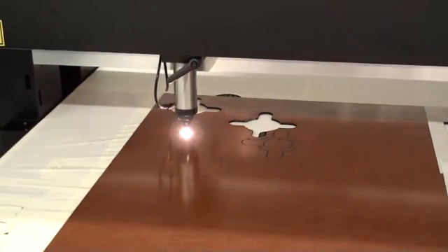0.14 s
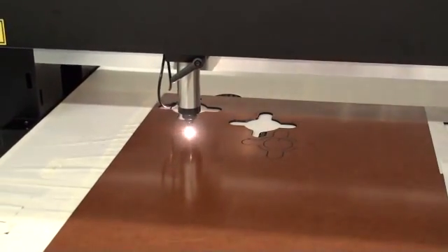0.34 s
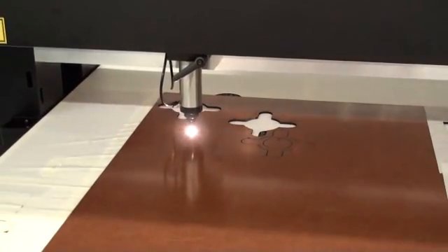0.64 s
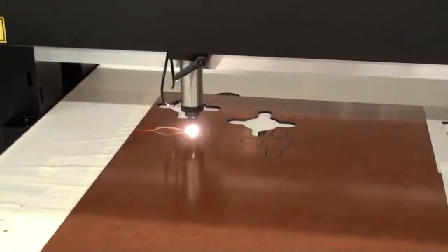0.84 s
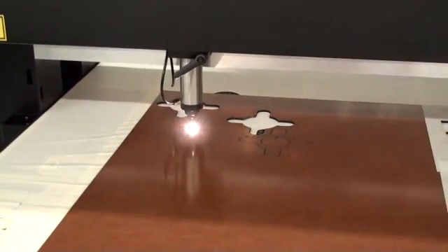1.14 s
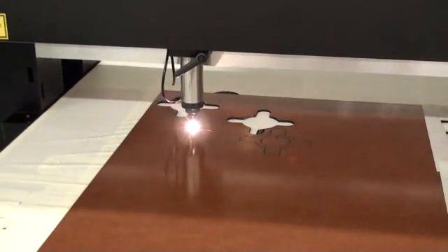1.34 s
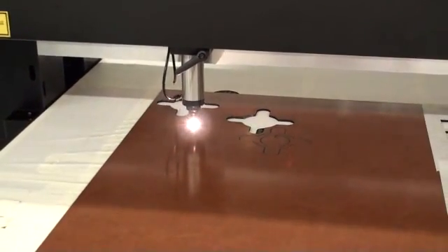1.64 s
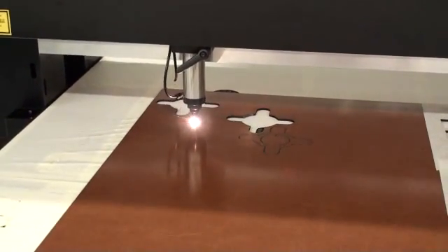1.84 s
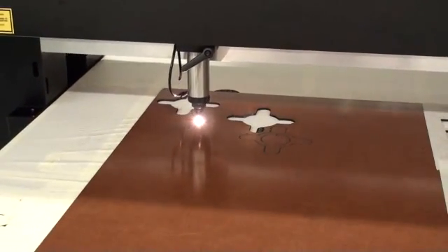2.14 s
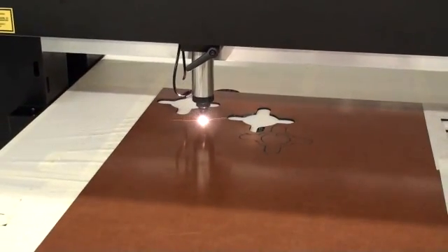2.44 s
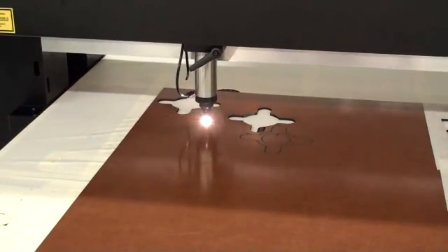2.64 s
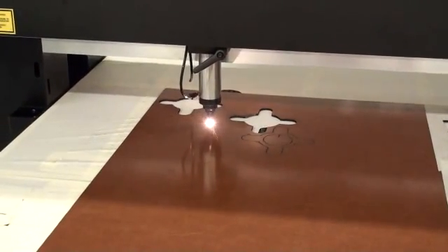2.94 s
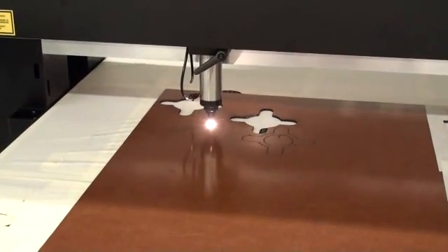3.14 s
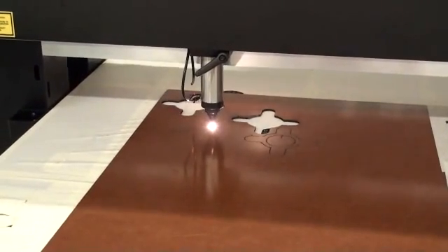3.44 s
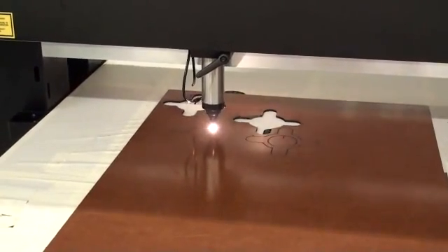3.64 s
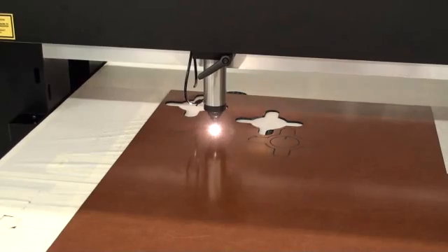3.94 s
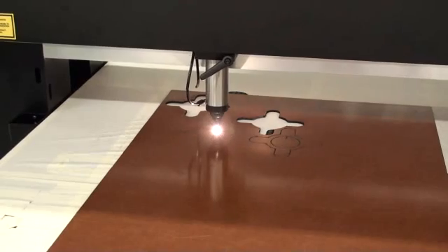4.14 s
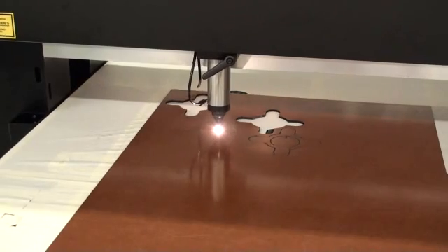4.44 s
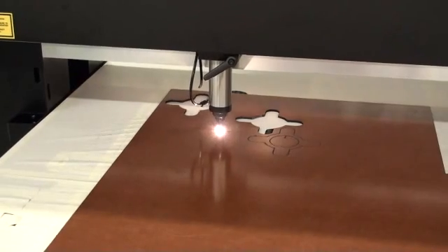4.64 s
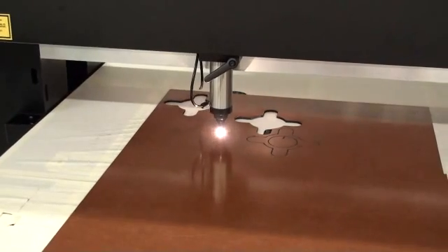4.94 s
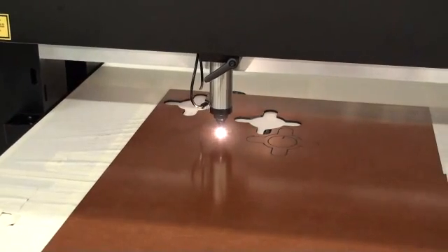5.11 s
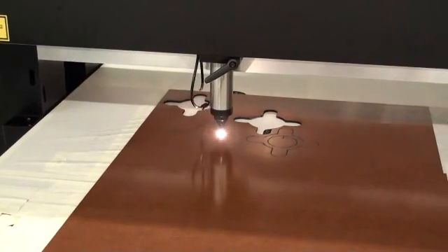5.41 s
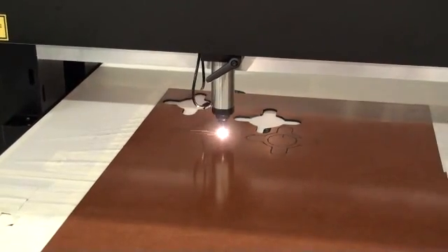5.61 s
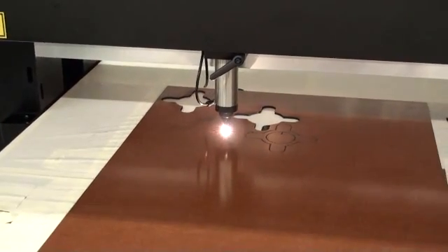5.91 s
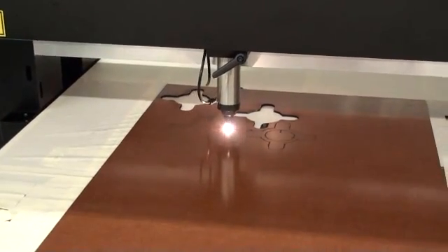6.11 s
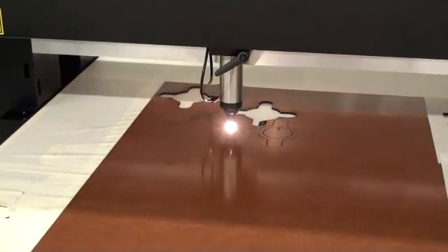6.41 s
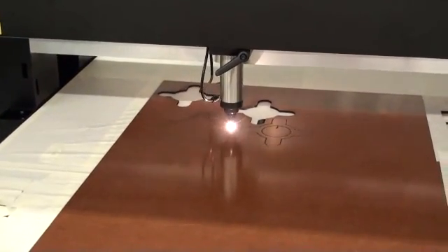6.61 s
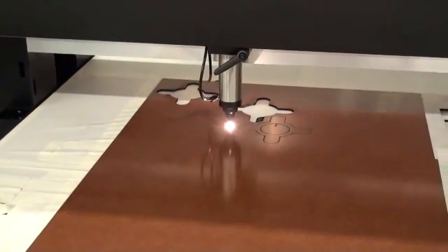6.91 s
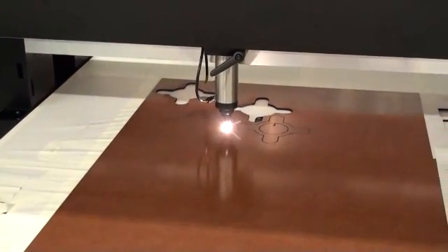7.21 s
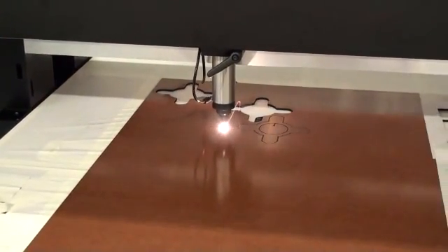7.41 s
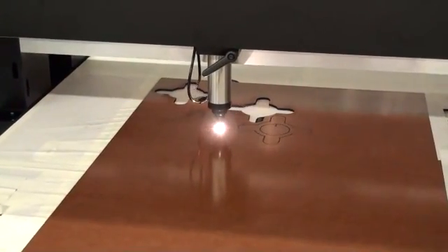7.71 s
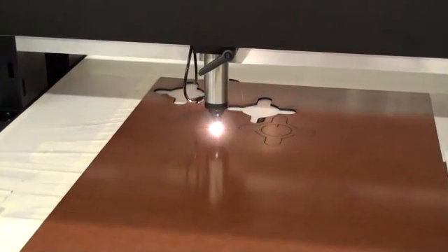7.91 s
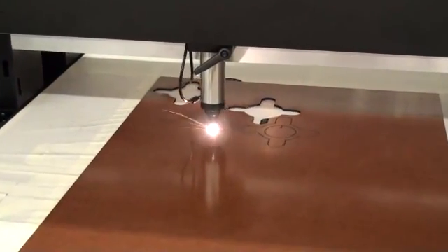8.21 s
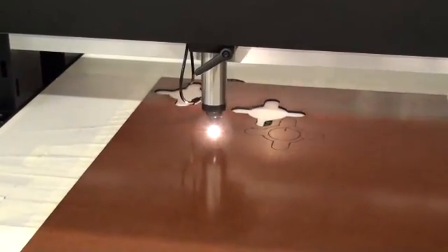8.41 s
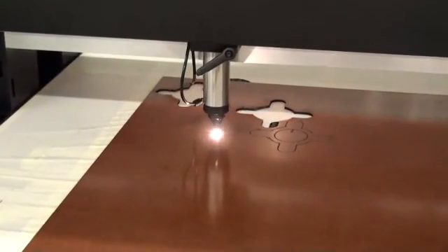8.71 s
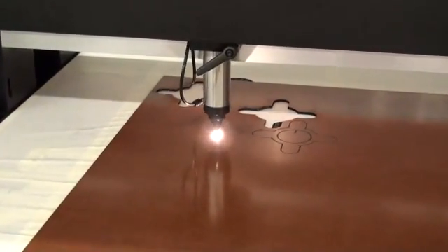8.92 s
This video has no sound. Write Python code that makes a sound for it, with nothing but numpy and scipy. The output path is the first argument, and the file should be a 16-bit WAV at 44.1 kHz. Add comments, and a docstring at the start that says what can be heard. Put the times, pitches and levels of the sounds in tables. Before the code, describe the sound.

Close to a laser cutting a sheet: shrill constant electronic-sounding whistle, rushing gas hiss and rough roar that swell and thin, faint low fan hum.

```python
"""A laser cutter at work: its beam fires 5000 times a second and the burning spot sings at that rate and its overtones.
Vapour and assist air roar through the cut (the kerf) and hiss at the nozzle: both are shaped noise.
The drive motors sing thin tones and rumble at turns; behind them the extraction fan hums over a low rush.
A small stereo recorder close by evens out the loudness.
In the finished sound, not at the machine, one hears the stereo width narrow and open at random."""
import sys
import numpy as np
from scipy import signal
from scipy.fft import rfft, irfft, next_fast_len
from scipy.io import wavfile
from scipy.ndimage import uniform_filter1d, map_coordinates

SR = 44100
rng = np.random.default_rng(int(sys.argv[2]) if len(sys.argv) > 2 else 0)


def volts_from_db(level):
    """Convert decibel levels to linear amplitude ratios."""
    exponent = np.asarray(level, float) / 20
    return 10 ** exponent


def generate_wav(signal):
    """Clip the signal to [-1, 1] and save it as 16-bit WAV at the path in sys.argv[1]."""
    frames = np.transpose(np.atleast_2d(signal))
    scaled = np.clip(frames, -1, 1) * 32767
    pcm = np.round(scaled).astype(np.int16)
    wavfile.write(sys.argv[1], SR, pcm)


N = 399546
TIME = np.arange(N) / SR  # seconds
PULSE_HZ = 5000.8

# Unsteady burning, as a noise spectrum: (frequency [Hz], relative density [dB per Hz])
FLUTTER_SPECTRUM = [(3, -2), (20, 4.5), (60, -1.5), (200, -6.5), (800, -31), (1500, -32), (3000, -36)]
# Left-right balance of the whine: (time [s], left over right [dB])
WHINE_BALANCE = [(0, 1), (4, 1.15), (4.3, 4), (4.8, -2.5), (5.3, 1), (8.2, 1.24), (9.06, -3.5)]
# The 1st partial swells and sinks as the head moves among its reflections: (time [s], level [dB])
FIRST_PARTIAL_LEVEL = [(0, -16), (.3, -11.5), (.53, -14), (.73, -20), (1.0, -17), (1.3, -17), (1.8, -9.5),
                       (2.15, -10.5), (2.6, -17), (3.0, -13), (3.4, -14), (3.55, -9), (4.06, -12),
                       (4.22, -18), (4.6, -17.5), (4.7, -14), (5.05, -16.5), (5.4, -20), (5.57, -15),
                       (5.61, -21), (5.72, -13.5), (5.9, -9.5), (6.8, -6), (7.3, -5), (8.0, -8.5),
                       (8.48, -9), (8.53, -12), (8.72, -10.5), (9.06, -10.5)]
# Strength of the 3rd partial, before the pulse length acts on it: (time [s], level [dB])
THIRD_PARTIAL_LEVEL = [(0, -35), (1.2, -36), (1.6, -43.5), (4, -37), (4.8, -35.5), (5.7, -34.5), (7.5, -34),
                       (9.06, -39)]
# The controller sets the pulse length by the feed, short in tight curves:
# (start time [s], beam-on share of the period [0 to 1])
BEAM_ON_SHARE = [(0, 0.362), (.175, 0.472), (.54, 0.3705), (1.29, 0.493), (1.6, 0.4916), (2.3, 0.4734),
                 (2.9, 0.491), (3.09, 0.442), (3.45, 0.4998), (4.015, 0.3688), (4.67, 0.476),
                 (5.08, 0.3663), (5.68, 0.435), (5.75, 0.4965), (5.92, 0.4718), (6.76, 0.4673),
                 (7.42, 0.481), (7.55, 0.421), (7.88, 0.4518), (8.15, 0.4423), (8.48, 0.382)]
# The drive reverses and the beam dims: (time [s], fall [s], recovery [s], dip of the 1st partial [dB],
# dip of overtones and air [dB], rumble level [dB])
REVERSALS = [(1.163, .028, .02, 20, 3, -45), (4.124, 0.0123, 0.0315, 20.5, 5.5, -48),
             (5.668, .04, .017, 23.5, 5, -42), (8.618, 0.032, 0.0304, 20.5, 8.5, -54.5)]
# Swells of the air noise: (time [s], roar in the kerf [dB], hiss at the nozzle [dB])
AIR_SWELLS = [(0, 0, -2.5), (.4, 2, 2), (1.17, 0.5, -1), (1.24, -4, -4), (1.4, 0.5, -0.5), (1.55, -1, -1.5),
              (2.0, 0, 0), (2.7, -3.5, -1), (3.0, -1, 0), (3.9, 0, -0.5), (4.9, 0, 0.5), (5.4, 0, -0.5),
              (5.8, -1, 2), (6.5, 0.5, 0.5), (7.5, 1.5, 1), (8.1, 2, 1.5), (8.45, -0.5, 1), (8.8, -5.5, -6),
              (9.06, -2.5, -3.5)]
# Colour of the roar in the kerf: (frequency [Hz], relative density [dB per Hz])
ROAR_SPECTRUM = [(300, -37), (520, -35.5), (580, -9.5), (870, -8.5), (975, -14), (1130, -12), (1270, -11),
                 (1560, -7.5), (2150, -3.5), (2400, -7.5), (3000, -6.5), (4250, -6), (4600, -10.5),
                 (5800, -42), (9000, -120)]
# Colour of the hiss at the nozzle: (frequency [Hz], relative density [dB per Hz])
HISS_SPECTRUM = [(3000, -21.5), (4000, -9.5), (4700, 1), (5500, -0.5), (6500, -5.5), (7100, -2.5),
                 (8500, -6.5), (9500, -2), (10600, -3.5), (11800, -2.5), (13000, -8.5), (15000, -13),
                 (16000, -6.5)]
# Cabinet resonances that colour the air: (centre [Hz], width [Hz], boost [dB])
CABINET_RESONANCES = [(593.4, 38, 1), (1116.4, 25, 5.5), (1576.5, 43, 4.5), (2108, 150, 2), (2555, 53, 4.5),
                      (3321, 82, 6), (4143, 200, 3), (7100, 110, 0.5)]
# Thin motor tones on straight runs: (start [s], end [s], frequency [Hz], level [dB])
MOTOR_TONES = [(3.1, 4.05, 5311, -46), (6.7, 7.55, 5311, -39), (6.7, 7.55, 4814, -37)]
# Colour of the drive's rumble: (frequency [Hz], relative density [dB per Hz])
RUMBLE_SPECTRUM = [(35, -51), (60, -19.5), (110, -1), (330, -1.5), (500, -8.5), (900, -31.5)]
# Steady lines of fan and mains: (frequency [Hz], level [dB], waver [dB])
HUM_LINES = [(58, -65, 0.5), (120, -58, 3), (137, -59, 1.5), (199, -69, 2.5), (273, -60, 2.5),
             (325, -64, 3), (357, -65, 2.5)]
# Colour of the fan's rush: (frequency [Hz], relative density [dB per Hz])
FAN_SPECTRUM = [(25, -30), (45, -26.5), (58, -15.5), (76, -23), (100, -18.5), (125, -3.5), (165, -19),
                (240, -13.5), (320, 0), (430, -12.5), (540, -8), (640, -4.5), (900, -16), (1500, -20),
                (2500, -32.5), (4000, -120)]
# How alike the noise is in both channels: (frequency [Hz], likeness [1 = the same])
LEFT_RIGHT_LIKENESS = [(60, 1), (400, 0.878), (1000, 0.931), (2500, 0.939), (6000, 0.889), (12000, 0.934)]


def burn():
    """The pulsed beam sings in three partials; higher ones flutter more, short pulses waver in level."""
    first_db, = curves(FIRST_PARTIAL_LEVEL)
    third_db, = curves(THIRD_PARTIAL_LEVEL)
    balance_db, = curves(WHINE_BALANCE)
    # flutter is 0.0815 of the tone at -9 dB, and smaller on a louder whine
    rough = 0.0815 * volts_from_db(0.515 * (-9 - first_db))
    short_pulse_waver = 8.35 * (.5 - duty()) * wobble(22)
    second_db = overtone_db(order=2, best_db=-16.5, leak=0.011) + 1.01 * wobble(12)
    third_db = overtone_db(order=3, best_db=third_db, leak=0.18)
    tone = partial(order=1, db=first_db - first_dip() + short_pulse_waver, rough=rough, phase=0)
    tone = tone + partial(order=2, db=second_db, rough=1.224 * rough, phase=1.04)
    tone = tone + partial(order=3, db=third_db, rough=2.4 * rough, phase=0)
    return tone * volts_from_db([balance_db / 2, -balance_db / 2])


def partial(order, db, rough, phase):
    """One partial of the pulse train; the flame's flutter shakes size and timing into a noisy skirt."""
    noise = rng.standard_normal((2, N))
    size, timing = unit(filtered(noise, lambda hz: volts_from_db(along(FLUTTER_SPECTRUM, hz))))
    drift = 0.5 * wobble(1.488)  # the path from the moving head changes length
    angle = 2 * np.pi * order * PULSE_HZ * TIME + phase + drift
    lag = 0.067 * wobble(1.12) * [[1], [-1]]  # the two microphone ports lie a little apart
    steady_part = (1 + rough * size) * np.sin(angle + lag)
    shaken_part = rough * timing * np.cos(angle + lag)
    return np.sqrt(2) * volts_from_db(db) * (steady_part + shaken_part)


def overtone_db(order, best_db, leak):
    """Level of a rectangular pulse's overtone: even ones vanish at half duty, the 3rd near a third; soft edges leak."""
    strength = np.abs(np.sin(order * np.pi * duty())) + leak
    return best_db + 20 * np.log10(strength) - dimming(lag_s=0.0128)


def duty(lag_s=0, ramp_s=0.051):
    """Beam-on share of the pulse period, stepping with short ramps."""
    start, share = np.transpose(BEAM_ON_SHARE)
    steps = zip(start[1:], np.diff(share))
    return share[0] + sum(step * within(s + lag_s, np.inf, ramp_s) for s, step in steps)


def first_dip():
    """dB lost by the 1st partial at the reversals: a pointed dip with its own fall and recovery."""
    total = 0
    for s, fall, recovery, db, *_ in REVERSALS:
        pace = np.where(TIME < s, fall, recovery)
        total = total + db * np.exp(-(np.abs(TIME - s) / pace) ** 0.99)
    return total


def dimming(lag_s):
    """dB lost by overtones and air, a little after each reversal: a rounded dip."""
    half_s = 0.0332
    return sum(db * np.exp(-((TIME - s - lag_s) / half_s) ** 2) for s, *_, db, _ in REVERSALS)


def air():
    """Longer pulses boil off more vapour, whose bursts make the kerf roar sputter; reflections recolour roar and hiss."""
    roar_swell, hiss_swell = curves(AIR_SWELLS) - dimming(lag_s=.035)
    short = .5 - duty(lag_s=0.009, ramp_s=0.0805)  # vapour follows the pulse length late and slowly
    sputter = wobble(60)
    # noise levels in dB at half duty, less a loss as the pulses shorten
    roar_db = -28.5 + 0.59 + roar_swell - 81 * short + 0.74 * sputter + 1.874 * wobble(900)
    hiss_db = -21 + 1.5 + hiss_swell - 31.5 * short + .5 * sputter + 0.495 * wobble(16)
    roar = volts_from_db(roar_db) * rush(ROAR_SPECTRUM, patchy_db=0.47, shifting_db=1.5)
    hiss = volts_from_db(hiss_db) * rush(HISS_SPECTRUM, patchy_db=1.0, shifting_db=1.5)
    return filtered(roar + hiss, cabinet) * volts_from_db([[.35], [-.35]])  # slightly to the left


def cabinet(hz):
    """The cabinet's resonances lift the sound around their centres."""
    boosts = [db / (1 + (2 * (hz - centre) / width) ** 2) for centre, width, db in CABINET_RESONANCES]
    return volts_from_db(sum(boosts))


def motor():
    """Straight runs hold a thin tone; the drive rumbles in slow curves, where pulses are short, and at reversals."""
    tones = 0
    for start, end, hz, db in MOTOR_TONES:
        tones = tones + np.sqrt(2) * volts_from_db(db) * within(start, end, .05) * np.sin(2 * np.pi * hz * TIME)
    lead_s, half_s = .02, .045  # the rumble comes just ahead of the reversal
    bursts = sum(volts_from_db(db) * np.exp(-((TIME - s + lead_s) / half_s) ** 2) for s, *_, db in REVERSALS)
    curving = np.abs(np.sin(2 * np.pi * duty()))  # 0 at half duty
    return tones + (bursts + volts_from_db(-49.5) * curving) * rush(RUMBLE_SPECTRUM, patchy_db=3.5)


def fan():
    """Extraction fan and mains: slightly unsteady lines on a low rush."""
    lines = 0
    for hz, db, waver_db in HUM_LINES:
        level = volts_from_db(db + waver_db * wobble(6))
        lines = lines + level * np.sin(2 * np.pi * hz * TIME + 0.77 * wobble(5))
    rush_level = volts_from_db(-48.0 + 0.97 * wobble(2.623))
    return np.sqrt(2) * lines + rush_level * rush(FAN_SPECTRUM, patchy_db=0.92)


def rush(spectrum, patchy_db, shifting_db=0):
    """Stereo noise of rms 1 with short patches of gain and a slowly shifting colour."""
    z = signal.stft(rng.standard_normal((2, N)), nperseg=512)[2]

    def field(bins, frames):
        """Random map over frequency and time, smoothed both ways."""
        across = uniform_filter1d(rng.standard_normal(z.shape[1:]), bins, 0)
        return unit(uniform_filter1d(across, frames, 1))

    def colour_and_spread(hz):
        """Spectrum shared between mid and side so that left and right are as alike as the table says."""
        turn = np.arccos(np.clip(along(LEFT_RIGHT_LIKENESS, hz), -1, 1)) / 2
        return volts_from_db(along(spectrum, hz)) * [np.cos(turn), np.sin(turn)]

    gain = volts_from_db(patchy_db * field(8, 8) + shifting_db * field(2, 150))
    pair = signal.istft(z * gain, nperseg=512)[1][:, :N]
    mid, side = filtered(pair, colour_and_spread)
    return unit(np.array([mid + side, mid - side]))


def unit(x):
    """Scaled to rms 1."""
    return x / np.sqrt(np.mean(x ** 2) + 1e-20)


def along(points, hz):
    """Reads (Hz, value) points on a log frequency axis."""
    f, v = np.transpose(points)
    return np.interp(np.log(hz + 1), np.log(f + 1), v)


def curves(rows):
    """One value per sample for each column after the time."""
    s, *cols = np.transpose(rows)
    return [np.interp(TIME, s, c) for c in cols]


def wobble(rate):
    """A smooth random curve through `rate` random points a second."""
    return map_coordinates(rng.standard_normal(int(N * rate / SR) + 4), [TIME * rate])


def within(start, end, fade):
    """1 inside the span, 0 outside, with short ramps."""
    return np.clip(np.minimum(TIME - start, end - TIME) / fade + .5, 0, 1)


def filtered(x, response):
    """x with each frequency scaled by response(hz)."""
    m = next_fast_len(N + 8192)
    return irfft(rfft(x, m) * response(np.fft.rfftfreq(m, 1 / SR)), m)[..., :N]


def scene():
    """All sources at the microphone."""
    return burn() + air() + motor() + fan()


def narrowed_at_random(left, right):
    """The stereo treble narrows to the middle and opens again at random; some low width stays."""
    mid, side = (left + right) / 2, (left - right) / 2
    wide = np.clip(6 * (wobble(9) + .45), 0, 1)  # leans towards open
    low_side = volts_from_db(-10.5) * filtered(side, lambda hz: hz < 3700)
    side = wide * side + (1 - wide) * low_side
    return np.array([mid + side, mid - side])


def top_cut(x):
    """Nothing passes above the cut-off."""
    return signal.sosfilt(signal.butter(12, 16050, fs=SR, output="sos"), x)


def record(dry):
    """Gain control at 2.5:1 lifts the room whenever the whine drops; band limits trim the lows and highs."""
    step = 1 / (.04 * SR)  # loudness is averaged over about 0.04 s
    power = signal.lfilter([step], [1, step - 1], dry.mean(0) ** 2, zi=[.04])[0]
    gain = (power / volts_from_db(-10) ** 2) ** -.3  # no change at -10 dB

    def band(hz):
        """Sharp top limit at 15230 Hz, soft bottom limit near 48 Hz."""
        return (hz < 15230) / (1 + (48 / (hz + 1)) ** 4)

    left, right = filtered(dry * gain, band)
    mix = narrowed_at_random(left, right)
    return top_cut(mix)


dry = scene()
out = record(dry)
generate_wav(out)
```